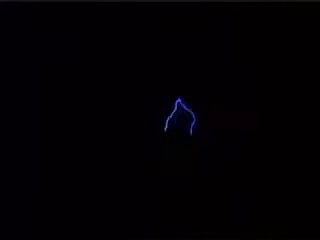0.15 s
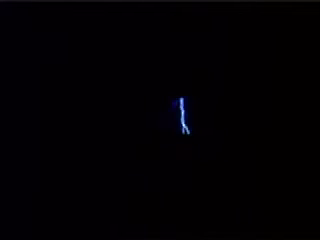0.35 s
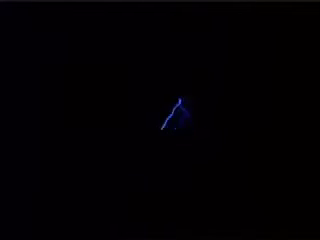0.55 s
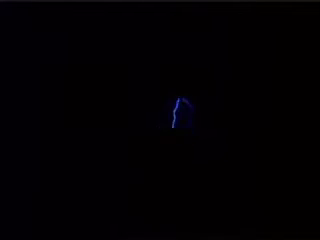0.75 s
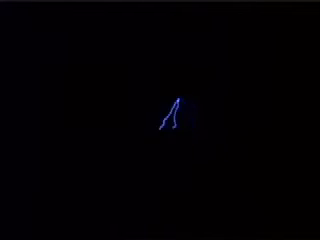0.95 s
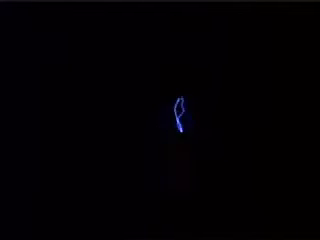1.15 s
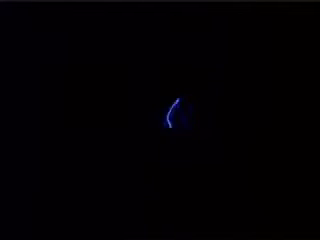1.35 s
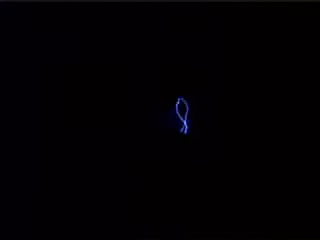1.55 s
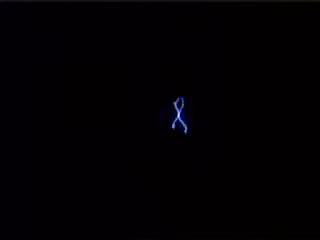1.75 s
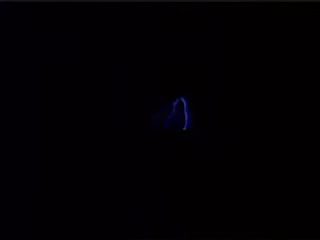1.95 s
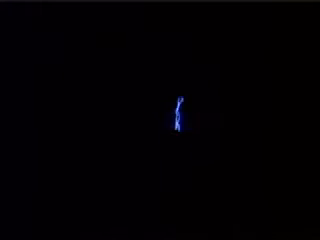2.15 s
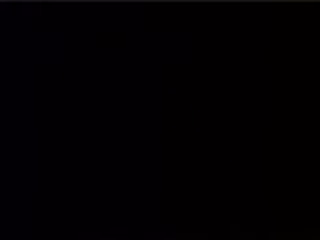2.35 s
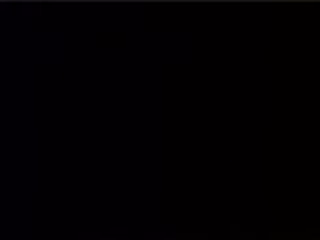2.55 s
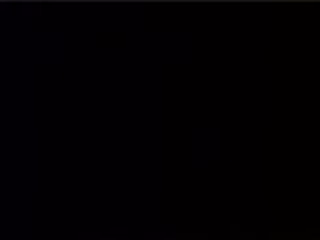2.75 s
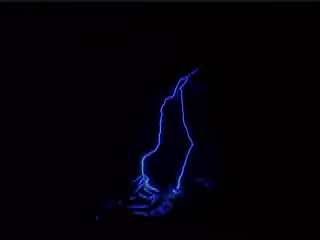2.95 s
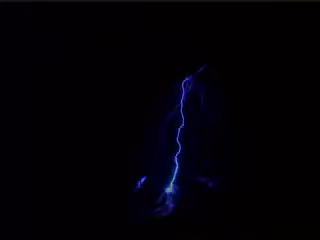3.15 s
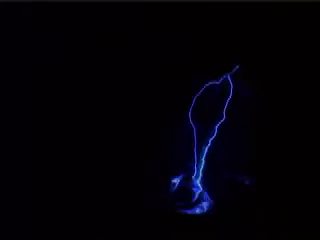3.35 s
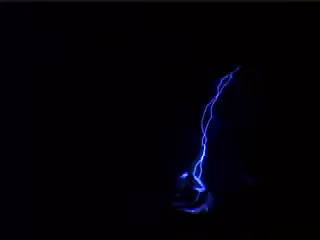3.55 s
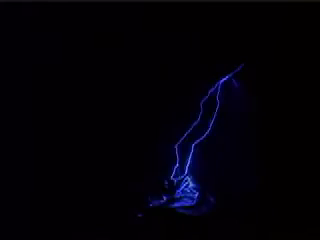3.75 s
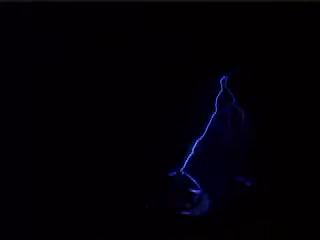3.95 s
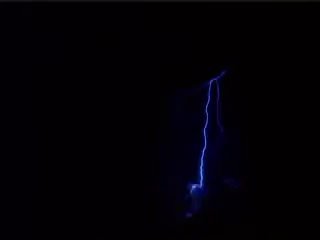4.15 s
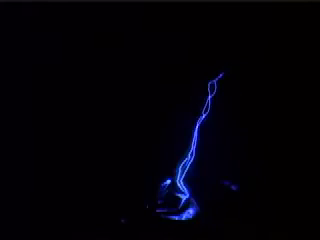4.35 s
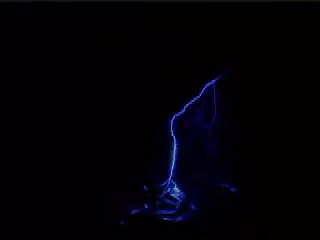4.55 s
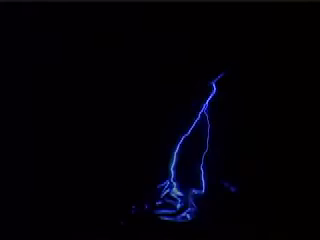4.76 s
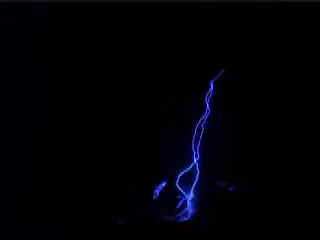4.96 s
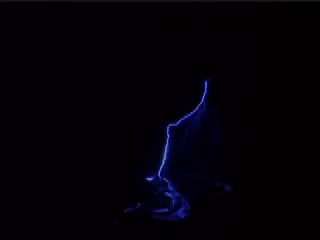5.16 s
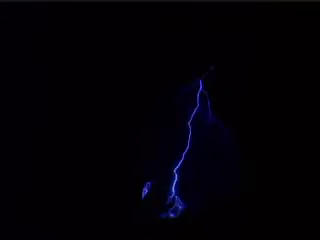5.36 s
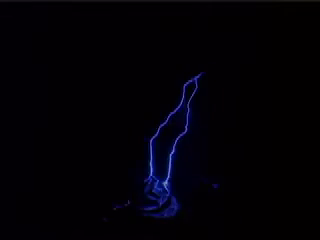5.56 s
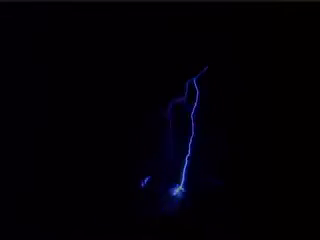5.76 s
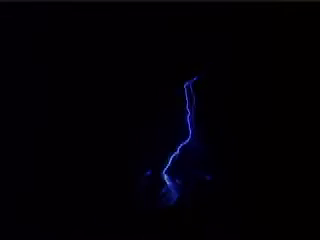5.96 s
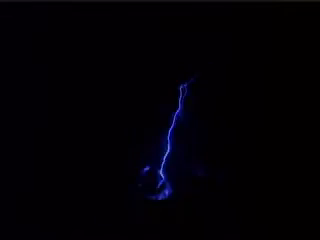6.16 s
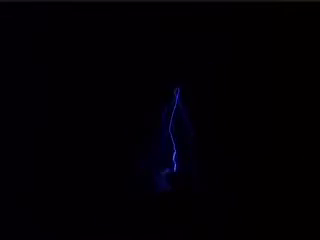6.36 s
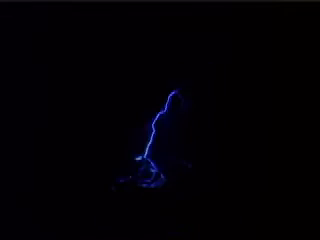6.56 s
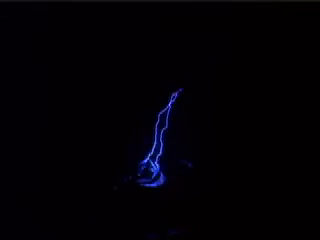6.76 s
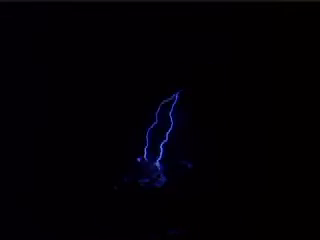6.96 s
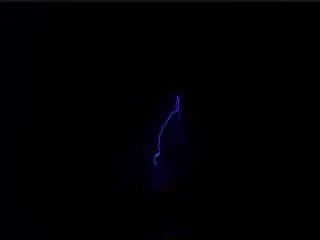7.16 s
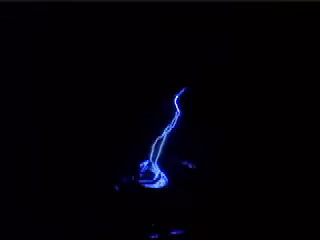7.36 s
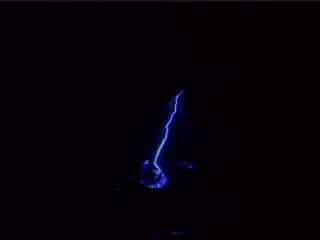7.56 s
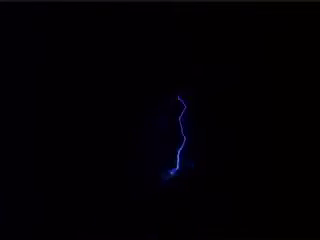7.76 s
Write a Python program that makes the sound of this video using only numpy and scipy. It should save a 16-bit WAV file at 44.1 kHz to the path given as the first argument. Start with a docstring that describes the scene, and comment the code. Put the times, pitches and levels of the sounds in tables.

```python
"""A small spark-gap coil on 50 Hz mains cracks about once a cycle in a small hard room for some 2.5 s.
Each crack comes direct, off the bench and walls, then as diffuse hiss, while resonances ring; each firing also
puts a short pop into the microphone, mostly stronger on the hard hits. The coil stops for half a second, and the
camera's own 150 Hz whine shows over faint hiss, sinking a little. Then the coil runs again, heard from closer by."""
import sys
import numpy as np
from scipy import signal
from scipy.fft import rfft, irfft
from scipy.io import wavfile

SR = 44100
rng = np.random.default_rng(int(sys.argv[2]) if len(sys.argv) > 2 else 0)


def gain_from_db(level_db):
    """Convert decibel levels to linear amplitude factors (20 dB per decade)."""
    decades = np.asarray(level_db, float) / 20
    return 10 ** decades


def wav_out(sig):
    """Save sig, one row per channel (or a flat mono array), as 16-bit PCM at SR to the path in sys.argv[1]."""
    wavfile.write(sys.argv[1], SR, np.round(np.clip(np.atleast_2d(sig).T, -1, 1) * 32767).astype(np.int16))


N = 343959
MOVED_S = 2.8  # firings before this are heard from the far place, later ones from the near place


def along(points, hz):
    """Value of (frequency [Hz], value) points on a log-frequency axis."""
    at, value = np.transpose(points)
    return np.interp(np.log(np.maximum(hz, 1)), np.log(at), value)


def causal(points, size=1024):
    """Minimum-phase response with the colour of (frequency [Hz], gain [dB]) points, scaled to peak 1."""
    gain = gain_from_db(along(points, np.fft.rfftfreq(size, 1 / SR)))
    cepstrum = irfft(np.log(gain), size)
    # fold the cepstrum forward in time
    cepstrum[1:size // 2] *= 2
    cepstrum[size // 2 + 1:] = 0
    response = irfft(np.exp(rfft(cepstrum)), size)[:size // 2]
    return response / np.abs(response).max()


def level(x, db):
    """Set the rms level."""
    return x * gain_from_db(db) / np.sqrt(np.mean(x ** 2))


def clicks(s, gain, size=N):
    """Single-sample impulses at times s."""
    at = np.clip(np.round(s * SR).astype(int), 0, size - 1)
    return np.bincount(at, gain, size)


# the far place, then the near place: (ordinary pop level [dB], echo level [dB], diffuse level [dB],
# frequency under which both ports hear the diffuse sound alike [Hz], left minus right [dB], kink strength [factor])
PLACE_MIX = [(-41, -0.5, -19.5, 680, -1.5, 0.3), (-40.5, 4.5, -26, 3600, -0.5, 0.28)]
# per place, how the cracks spread: (time the diffuse sound takes to build [s], spread of the kink cracks [s])
PLACE_SPREAD = [(.005, .0005), (.002, .0007)]
# per place, the crack colour: (frequency [Hz], relative level [dB])
CRACK_COLOUR = [
    [(60, -53), (300, -35), (700, -22), (950, -11), (1500, -14.5), (2000, -10.5), (3500, -7.5),
     (6300, -0.5), (9000, -1.5), (12000, -5.5), (14300, -12.5), (15000, -48)],
    [(60, -63), (300, -31.5), (700, -17.5), (850, -8), (950, -6.5), (2000, -7), (4000, -3), (6200, -0.5),
     (9000, 0.5), (12000, -4), (15000, -16.5)],
]
# per place, reflections off bench and walls: (delay [ms], left level [dB], right level [dB])
EARLY_ECHOES = [
    [(.6, -10, -10), (.85, -12, -13), (2.4, -20, -13), (3.65, -18, -11), (4.45, -16, -1), (4.85, -14, -4),
     (5.2, -18, -10), (6.2, -10, -15), (7.1, -16, -12), (10.1, -15, -12), (11.8, -17, -11)],
    [(.25, -14, -14), (2.4, -8, -12), (2.55, -12, -16), (2.75, -9, -12), (3.0, -16, -13), (3.3, -17, -17),
     (4.0, -18, -10), (4.4, -16, -10), (4.75, -9, -16), (5.8, -15, -18), (10.5, -19, -26)],
]
# per place, bench and room resonances: (frequency [Hz], left level [dB], right level [dB], t60 [s])
RESONANCES = [
    [(50, -68, -40.5, 0.14), (157, -72, -43.5, 0.11), (206, -53, -37.5, 0.11), (242, -58, -38, 0.12),
     (353, -47, -51, 0.14), (406.5, -57, -34.5, 0.11), (506, -30, -27, 0.06), (552.6, -37.5, -39, 0.1),
     (611, -53, -33.5, 0.14), (805, -57, -51, .15), (891, -39, -37.5, 0.14), (1325, -46, -32, 0.14),
     (1752, -37.5, -54, 0.4), (5880, -38, -10.5, 0.066), (6500, -38, -42, .05)],
    [(51, -62, -55, 0.28), (241, -74, -48, 0.23), (455, -46, -46.5, 0.15), (548.3, -51.5, -64, 0.48),
     (750.8, -49, -48, 0.25), (1303, -19.5, -16.5, 0.017), (3400, -40, -41, 0.06),
     (3940, -35, -18.5, 0.029), (4740, -50, -10.5, 0.023), (7820, -8, -46, 0.025), (8630, -39, -44, 0.046)],
]


def coil():
    """The direct crack depends on how the channel faces the microphone; the room hears a steadier one."""
    s, blast, crack, pop = firings()
    out = np.zeros((2, N))
    for k, (_, echo_db, diffuse_db, alike_hz, pan_db, kinks) in enumerate(PLACE_MIX):
        here = (s > MOVED_S) == k
        at, power = s[here], blast[here]
        build_s, spread_s = PLACE_SPREAD[k]
        direct = streamer(at, crack[here], spread_s, kinks)
        reflected = room(at, power, EARLY_ECHOES[k], echo_db, diffuse_db, alike_hz, build_s)
        coloured = signal.fftconvolve(direct + reflected, causal(CRACK_COLOUR[k])[None])[:, :N]
        out += coloured * gain_from_db(np.array([[pan_db], [-pan_db]]) / 2)
        out += signal.fftconvolve(clicks(at, power)[None], rings(RESONANCES[k]))[:, :N]
    return out + pops(s, pop)


# the coil is switched on twice: (first firing [s], last firing [s])
COIL_RUNS = [(.0082, 2.4577), (3.0134, 7.7935)]
# loudness of the coil as the room hears it: (time [s], level [dB])
BLAST_POWER = [(0, -7), (.9, -8), (1.9, -7.5), (2.46, -8), (3.018, -12), (3.034, -6.5), (3.6, -6),
               (4.05, -6), (4.6, -7.5), (5.3, -7.5), (5.94, -8), (5.97, -2.5), (6.07, -7), (6.3, -7.5),
               (7.0, -8), (7.3, -8), (7.33, -5), (7.8, -7.5)]
# per place, the direct crack of an ordinary firing: (level [dB], scatter [dB])
ORDINARY_CRACK = [(-4.5, 1.5), (-6.5, 2.4)]
# per place, lesser hits on the target:
# (share of firings [0-1], crack level [dB], crack scatter [dB], pop level [dB], pop scatter [dB])
LESSER_HITS = [(.03, -4, -1, -42, 2.1), (.8, -5, 2, -31, 3.5)]
# stretches in which no lesser spark hits the target: (start [s], end [s])
TARGET_LULLS = [(3.16, 3.2), (3.26, 3.3), (3.63, 3.68), (3.99, 4.11), (4.33, 4.39), (4.43, 4.47),
                (4.63, 4.69), (4.77, 4.81), (4.91, 4.99), (5.11, 5.21), (5.49, 5.53), (5.89, 6.05),
                (6.09, 6.11), (6.29, 6.33), (6.41, 6.55), (6.57, 6.61), (6.65, 6.71), (7.07, 7.11),
                (7.19, 7.32)]
# firings that stand out, hard or off the beat: (time [s], crack level [dB], pop level [dB])
HARD_STRIKES = [(.0283, -13, -34), (0.1086, -4, -35), (0.3484, -3.5, -36), (0.3683, -3, -34),
                (.45, -1, -36), (.55, -1, -45), (.567, -5, -42), (0.7496, -8, -45), (.7684, -6, -30.5),
                (.829, -4, -36), (1.0568, -2, -38), (1.131, -2, -36), (1.2396, 1, -31), (1.277, -3, -36),
                (1.58, -7, -32), (3.018, -10, -50), (3.0339, -5, -25), (3.0933, -3.5, -30),
                (3.1142, 1, -23), (3.1336, -2, -21.5), (3.1963, -2, -38.5), (3.2131, 1.5, -22.5),
                (3.2343, -5.5, -25), (3.2528, -7, -28.5), (3.297, -1, -35), (3.3136, 2, -19),
                (3.3737, 2, -26), (3.414, 0, -33), (3.4541, -6, -26), (3.535, 1, -20.5), (3.5534, -2, -24),
                (3.623, -3.5, -30), (3.694, -0.5, -25), (3.7129, -5, -28.5), (3.8946, -1.5, -26),
                (3.9154, 0, -32), (3.934, 0.5, -23.5), (3.9832, -1.5, -25), (4.0452, -2, -30),
                (4.1237, -4, -30), (4.3238, -3, -23), (4.4035, -3, -29.5), (4.5434, -2.5, -25),
                (5.0433, -5.5, -26), (5.3633, -6, -28.5), (5.5432, -6, -28), (5.604, 1, -23),
                (5.7632, -3.5, -26), (6.0145, -5, -28), (6.064, -1, -26), (6.0838, -2.5, -26),
                (6.1238, -9, -27.5), (6.2232, -3, -31), (6.343, -4, -27), (6.5034, -3, -33.5),
                (6.6237, -0.5, -26), (6.8037, -6, -29), (7.0232, -3, -32), (7.0633, -3, -27.5),
                (7.3337, -1, -23), (7.3557, -1.5, -24), (7.3743, -5, -28), (7.475, -5.5, -25),
                (7.494, -5, -23), (7.5744, 0, -31), (7.6143, -2.5, -31), (7.6947, -3, -23),
                (7.7743, -4, -26)]


def firings(least_jitter_s=.0001, restless_db_per_db=4.5):
    """Times of all firings with blast, crack and pop gain; a strike takes the place of its cycle's firing."""
    s = np.concatenate([beat(*run) for run in COIL_RUNS])
    chance = rng.standard_normal((len(s), 4)).T
    place = (s > MOVED_S).astype(int)
    crack_db, scatter_db = np.transpose(ORDINARY_CRACK)[:, place]
    pop_db = np.transpose(PLACE_MIX)[0, place]
    power_db = np.interp(s, *np.transpose(BLAST_POWER))
    # a weak ordinary firing cannot crack much louder than it blasts
    crack = gain_from_db(np.minimum(crack_db + scatter_db * chance[0], power_db + 8))
    pop = gain_from_db(pop_db) * chance[1]  # ordinary pops go either way

    share, hit_db, hit_scatter_db, hit_pop_db, pop_scatter_db = np.transpose(LESSER_HITS)[:, place]
    in_lull = np.any([(s > a) & (s < b) for a, b in TARGET_LULLS], axis=0)
    hit = (rng.random(len(s)) < share) & ~in_lull
    crack[hit] = gain_from_db(hit_db + hit_scatter_db * chance[0])[hit]
    pop[hit] = gain_from_db(hit_pop_db + pop_scatter_db * chance[1])[hit]

    # the louder the coil, the less evenly it fires
    restless = gain_from_db(restless_db_per_db * np.clip(power_db + 8, 0, 2))
    s = s + least_jitter_s * restless * chance[2]
    hard_s, hard_db, hard_pop_db = np.transpose(HARD_STRIKES)
    cycle = np.abs(s[:, None] - hard_s).argmin(axis=0)
    s[cycle], crack[cycle], pop[cycle] = hard_s, gain_from_db(hard_db), gain_from_db(hard_pop_db)
    blast = gain_from_db(power_db + 1.0 * chance[3])
    return s, blast, crack, pop


# moments at which the gap waits an extra half cycle: (time [s])
GAP_SLIPS = [.94, .97, 1.04, 1.09, 1.18, 1.21, 1.22, 3.605, 3.635, 3.965, 3.995, 4.025, 5.955, 6.045, 7.315]


def beat(first, last, mains_hz=50):
    """One firing every second half cycle; each slip delays all later firings by one half cycle."""
    half = np.linspace(first, last, round((last - first) * 2 * mains_hz) + 1)
    slips = np.array([s for s in GAP_SLIPS if s > first])
    waited = np.searchsorted(slips, half, side="right")
    fires = (np.arange(len(half)) - waited) % 2 == 0
    fires[np.searchsorted(half, slips[slips < last])] = False
    return half[fires]


def streamer(s, gain, spread_s, share, count=10):
    """A crooked channel: its kinks lie at other distances from each port, so small cracks crowd the main one."""
    chance = rng.standard_normal((len(s), 2, count, 2))
    at = s[:, None, None] + spread_s * chance[..., 0]
    size = gain[:, None, None] * chance[..., 1]
    kinks = np.array([clicks(at[:, port].ravel(), size[:, port].ravel()) for port in (0, 1)])
    return clicks(s, gain) + share * kinks


def pops(s, pop):
    """One-sided pops with the area of a 1 ms step, packed into a few samples; each port takes its own share."""
    shape = np.exp(-np.arange(64) / SR / .00006)
    shape = shape[None] / shape.sum() * SR / 1000
    uneven = -.15 + 0.2 * rng.standard_normal(len(s))
    ports = np.array([clicks(s, pop * (1 + uneven)), clicks(s, pop * (1 - uneven))])
    return signal.fftconvolve(ports, shape)[:, :N]


def room(s, gain, echoes, echo_db, diffuse_db, alike_hz, build_s, same=0.92, moved_hz=2000, count=4):
    """Early echoes and diffuse sound; every channel stands elsewhere, so short waves take new paths each time."""
    ms, *sides_db = np.transpose(echoes)
    echo_taps = np.array([clicks(ms / 1000, gain_from_db(db + echo_db), size=1024) for db in sides_db])
    early = signal.fftconvolve(streamer(s, gain, spread_s=.0003, share=.17), echo_taps, axes=1)
    # a new mixture of a few treble tails at each firing, over one tail that stays the same
    spot = rng.standard_normal((len(s), count))
    spot /= np.linalg.norm(spot, axis=1, keepdims=True)
    tail = signal.fftconvolve(clicks(s, gain * same)[None], diffuse(alike_hz, build_s, low_hz=100))
    for weight in spot.T:
        tail += signal.fftconvolve(clicks(s, gain * weight)[None], diffuse(alike_hz, build_s, moved_hz))
    return early[:, :N] + gain_from_db(diffuse_db) * tail[:, :N]


# main decay of the room: (frequency [Hz], t60 [s])
ROOM_DECAY = [(200, 0.93), (1000, 0.28), (4000, 0.23), (9000, 0.15), (14000, 0.13)]


def diffuse(alike_hz, build_s, low_hz, size=32768):
    """Stereo noise, thinned below low_hz, that builds up and dies band by band, with a weaker slow late decay."""
    late_db, late_t60_s = -36, .7
    t = np.arange(size) / SR
    hz = np.fft.rfftfreq(size, 1 / SR)
    mid, side = rfft(rng.standard_normal((2, size))) * hz / np.hypot(hz, low_hz)
    noise = mid + side * hz / np.hypot(hz, alike_hz) * np.array([[1], [-1]])
    tail = 0
    for centre in 62.5 * 2. ** np.arange(9):  # overlapping octave bands [Hz]
        band = np.clip(1 - np.abs(np.log2(np.maximum(hz, 1) / centre)), 0, 1)
        fade = gain_from_db(-60 * t / along(ROOM_DECAY, centre)) + gain_from_db(late_db - 60 * t / late_t60_s)
        tail = tail + irfft(noise * band, size) * fade
    return tail * (1 - np.exp(-t / build_s))


def rings(modes, rise_s=0.0023, size=16384):
    """Decaying sines that swell as the blast fills the room; neighbouring modes swing in opposite sense."""
    t = np.arange(size) / SR
    total = 0
    for k, (hz, left_db, right_db, t60) in enumerate(modes):
        fade = gain_from_db(np.array([[left_db], [right_db]]) - 60 * t / t60)
        total = total + (-1) ** k * fade * np.sin(2 * np.pi * hz * t)
    return (1 - np.exp(-t / rise_s)) * total


# the camera's own noise sinks through the pause: (time [s], gain [dB])
CAMERA_FADE = [(2.5, 4), (2.7, 1.5), (3.0, -1.5)]


def camera():
    """Motor whine over smooth hiss, both following one slow fade."""
    fade = gain_from_db(np.interp(np.arange(N) / SR, *np.transpose(CAMERA_FADE)))
    return (whine() + hiss()) * fade


# strongest overtones of the whine, before the fade: (frequency [Hz], level [dB])
STRONG_OVERTONES = [(150, -82), (300, -80), (600, -83), (750, -81), (900, -80), (1200, -84), (3150, -82),
                    (3300, -84), (3900, -82), (4200, -80), (4500, -84), (5850, -79), (6150, -81),
                    (6300, -74), (6450, -80), (7050, -82), (7350, -79), (7800, -77), (8700, -82),
                    (9450, -80), (9900, -81), (11250, -82)]
# the other overtones against their resting level: (frequency [Hz], gain [dB])
OVERTONE_HUMP = [(150, -6), (2500, -6), (5000, 0), (7000, 1), (11000, -1), (14000, -4)]


def whine(whine_hz=150, rest_db=-82, count=97):
    """A motor turn repeated exactly, so its overtones are sharp; a few of them are strong."""
    db = rest_db + along(OVERTONE_HUMP, whine_hz * np.arange(count)) + 2.5 * rng.standard_normal(count)
    hz, line_db = np.transpose(STRONG_OVERTONES)
    db[np.round(hz / whine_hz).astype(int)] = line_db
    period = SR // whine_hz
    phase = 2 * np.pi * np.arange(period) / period
    # a quarter turn apart at the two ports, so each port carries the lines a little above their common level
    lead = np.pi / 4 * np.outer([1, -1], rng.choice([-1, 1], count))
    start = 2 * np.pi * rng.random(count) + lead
    turn = sum(2 * gain_from_db(db[k]) * np.sin(k * phase + start[:, k, None]) for k in range(1, count))
    return turn[:, np.arange(N) % period]


# colour of the hiss: (frequency [Hz], relative level [dB])
HISS_COLOUR = [(30, 2), (70, -2), (250, -11), (1000, -16), (3000, -19), (7000, -19), (9000, -32),
               (14000, -43), (15000, -62)]


def hiss():
    """Steady noise, independent at the two ports, strongest in the bass."""
    colour = gain_from_db(along(HISS_COLOUR, np.fft.rfftfreq(N, 1 / SR)))
    noise = irfft(rfft(rng.standard_normal((2, N))) * colour, N)
    return level(noise, -64)


def scene():
    """Coil and camera."""
    return coil() + camera()


def roll_off(x):
    """The treble ends steeply here."""
    return signal.sosfilt(signal.butter(12, 15790, fs=SR, output="sos"), x)


def record(dry):
    """The input clips at full scale, then a steep low-pass cuts the top."""
    clipped = np.clip(dry, -1, 1)
    low_pass = signal.cheby1(8, .5, 14150, fs=SR, output="sos")  # ripple [dB], cutoff [Hz]
    finished = signal.sosfilt(low_pass, clipped)
    return roll_off(finished)


dry = scene()
out = record(dry)
wav_out(out)
```